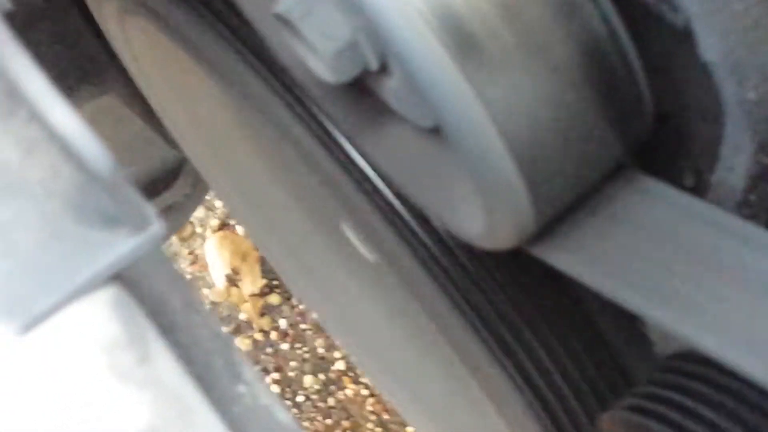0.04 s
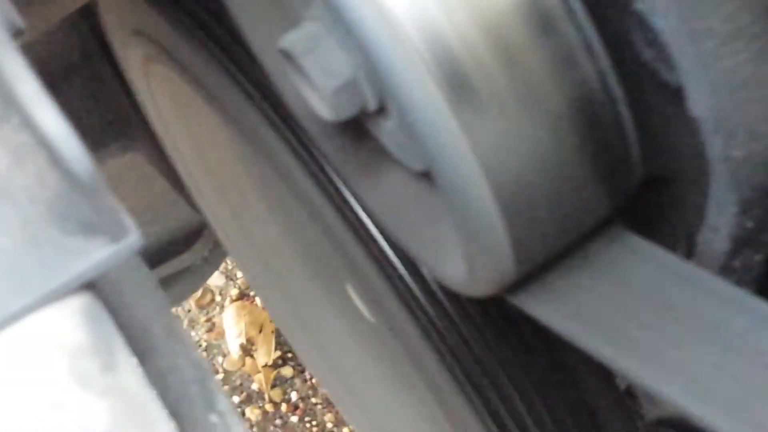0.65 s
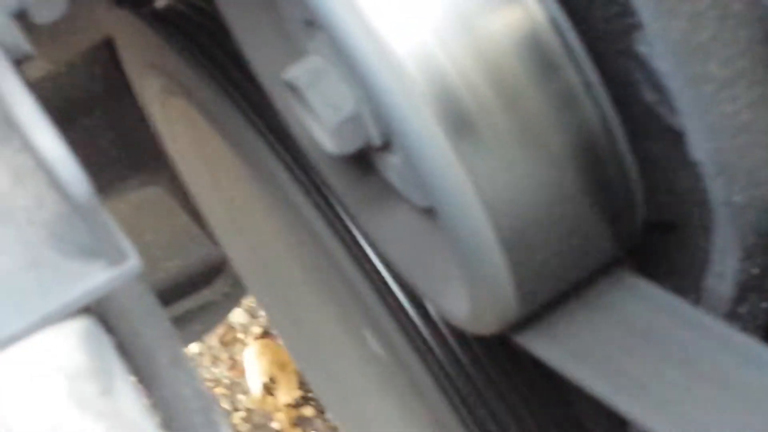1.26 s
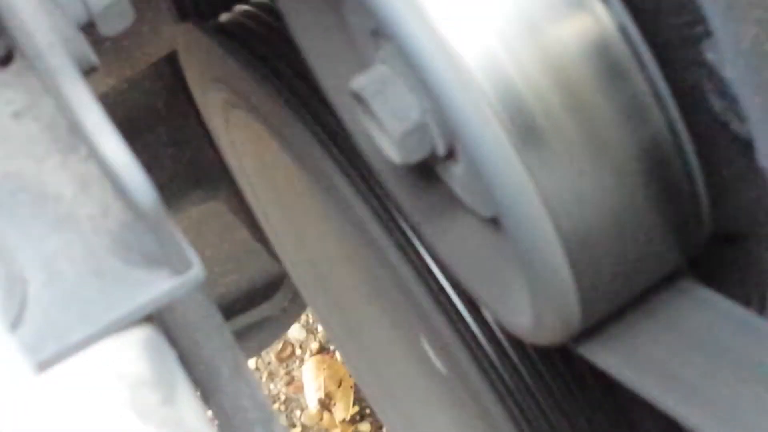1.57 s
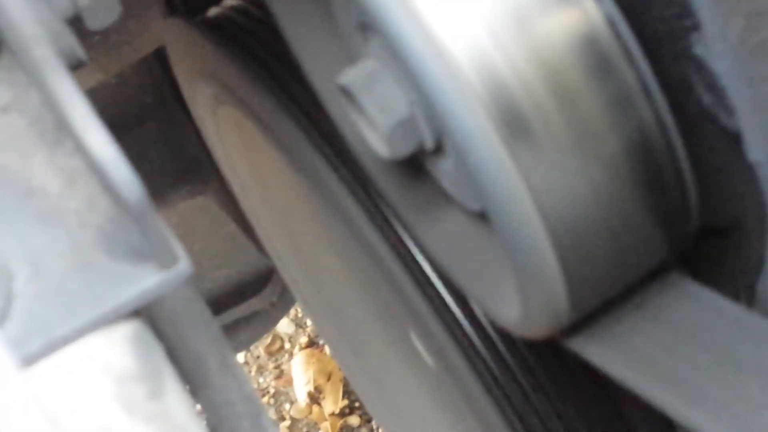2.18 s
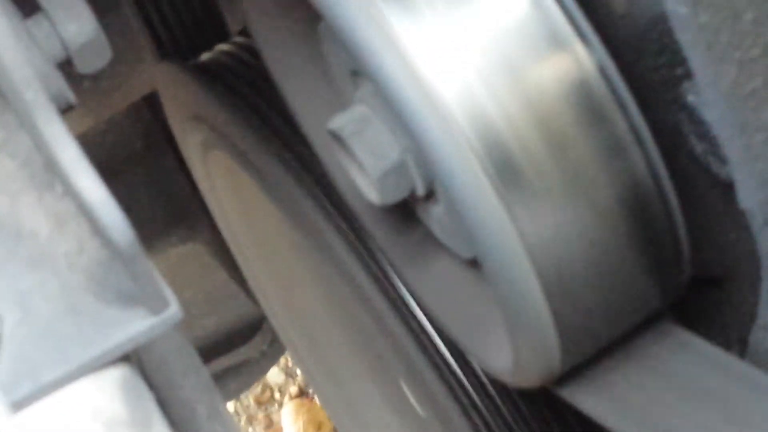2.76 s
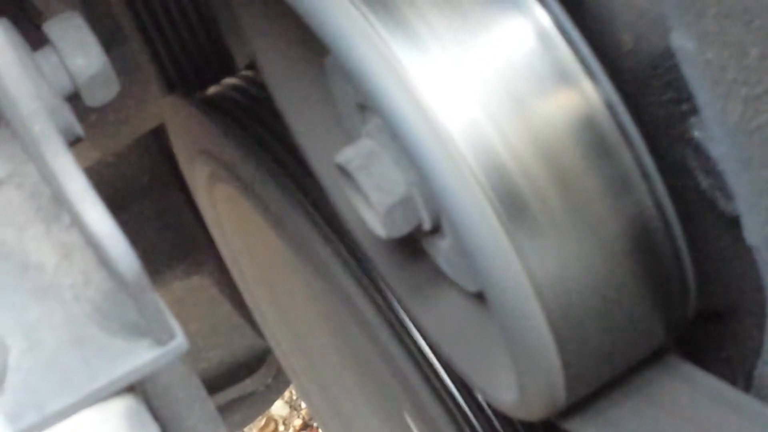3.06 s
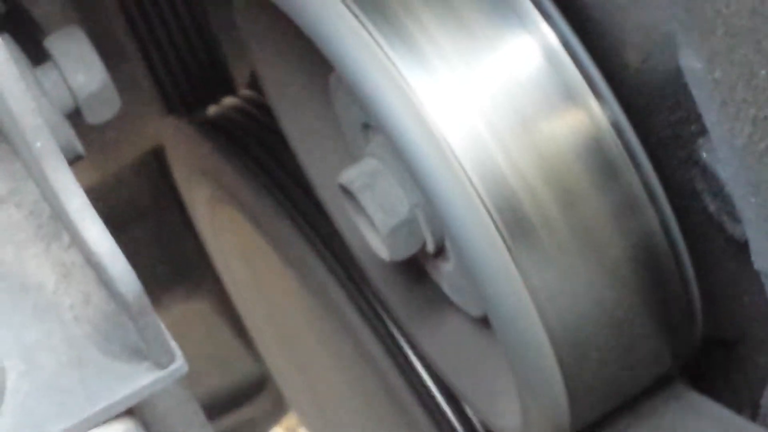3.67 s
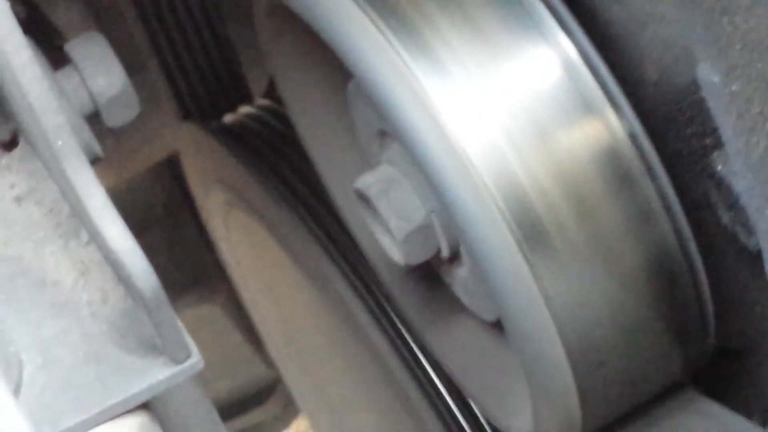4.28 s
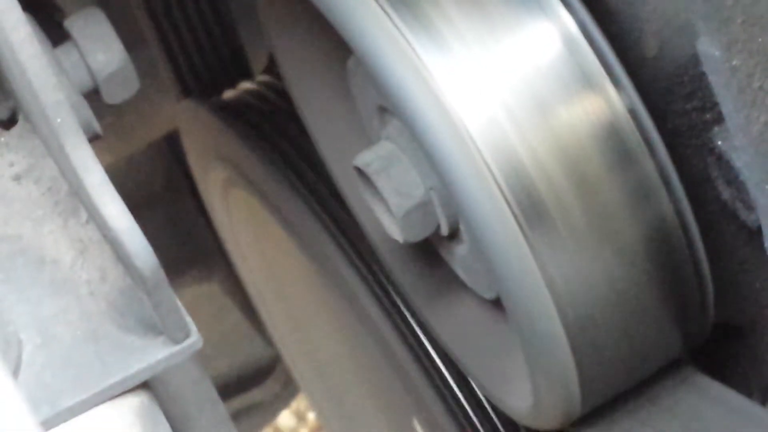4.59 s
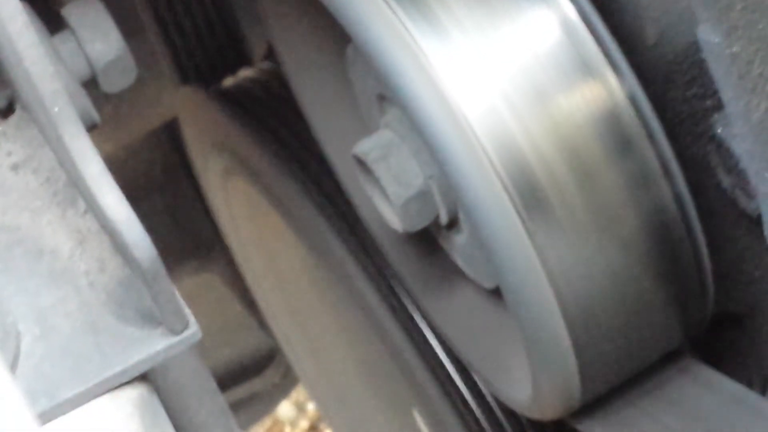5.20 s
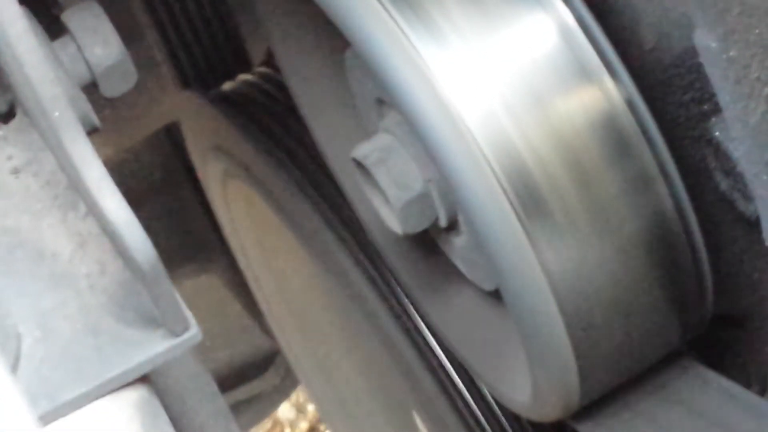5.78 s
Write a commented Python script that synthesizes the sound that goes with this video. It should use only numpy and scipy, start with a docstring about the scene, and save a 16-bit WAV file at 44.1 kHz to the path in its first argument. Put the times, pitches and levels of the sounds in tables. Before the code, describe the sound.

Close up, a slipping drive belt gives a piercing, fluttering squeal and a rhythmic scrape over the low drone of an idling car engine.

```python
"""Engine bay of an idling car, stereo microphone a hand's width from a ribbed belt on a spinning pulley.
The belt sticks and slips, squealing near 4 kHz; once every crank turn it pulls tight, a high chirp dives
and the squeal breaks into a scrape. On the hardest grabs the recorder overloads and crackles. Underneath,
the engine and its fan drone and the accessories whine; the metal all around throws the squeal back."""
import sys
import numpy as np
from scipy import signal
from scipy.fft import rfft, irfft
from scipy.io import wavfile
from scipy.ndimage import uniform_filter1d

SR = 44100
rng = np.random.default_rng(int(sys.argv[2]) if len(sys.argv) > 2 else 0)


def wrap_up_sound(samples):
    """Save the sound to the file named by the first command line argument, as 16-bit audio."""
    columns = np.atleast_2d(samples).T
    # keep every value between -1 and 1, then stretch to whole-number steps
    tamed = np.clip(columns, -1, 1)
    steps = np.round(tamed * 32767).astype(np.int16)
    wavfile.write(sys.argv[1], SR, steps)


N = 266364
TIME, FREQS = np.arange(N) / SR, np.fft.rfftfreq(N, 1 / SR)
FIRINGS, PULLEY_RATIO = 3, 3.888  # cylinder firings and pulley turns per crank turn

# idle speed of the crankshaft: (time [s], speed [turns/s])
IDLE = [(0.0, 13.138), (0.4, 13.292), (1.0, 13.102), (2.0, 13.217), (2.7, 13.135), (3.5, 13.567),
        (4.1, 13.275), (4.7, 12.784), (5.4, 13.333), (6.04, 13.348)]


def belt(turn, swing_db=4.0, flutter_db=3.5, sag_hz=14, tug_hz=20, catch_turns=.062, slack_turns=.065):
    """Drive of scrape and squeal, and their pitch: tension swings once a turn and each firing tugs."""
    # slow changes of tension and tracking: (time [s], scrape drive [dB], squeal drive [dB], pitch [Hz])
    drift = [(0, 1.9, -0.5, 4126), (0.5, 0.03, 0, 4116), (1.4, 0.2, 2, 4103), (2.3, 0.12, 4, 4099),
             (3.0, 0.98, 4.5, 4157), (3.55, -0.5, 5.5, 4157), (4.1, -1.5, -0.5, 4078), (4.65, 0.1, 0, 4094),
             (5.2, -0.57, 0.5, 4132), (6.04, -1, -1.5, 4114)]
    # one lap of the belt, a row per crank turn:
    # (scrape drive when tight [dB], pitch leap when slack [Hz], squeal drive when slack [dB])
    lap = [(3, 80, -1.5), (2, 24.87, -1.5), (1.5, 70, -4), (3.3, 150, -2.5)]
    catch_db, leap_hz, dip_db = np.transpose(lap)
    scrape_db, squeal_db, pitch_hz = curves(drift, TIME)
    tension = np.cos(2 * np.pi * turn)
    tug = np.cos(2 * np.pi * FIRINGS * (turn + .02))
    glaze = np.cos(2 * np.pi * (turn - 1.47) / len(lap))  # one stretch of belt squeals more readily
    dropouts = flutter_db * np.minimum(wander(100), .9)  # the tone falters easily but has an upper limit
    scraping = swing_db * tension + once_a_turn(turn, catch_db, catch_turns) + .97 * wander(12)
    singing = .1 * tension + 1.7 * glaze + once_a_turn(turn - .5, dip_db, slack_turns) + dropouts
    bend = once_a_turn(turn - .5, leap_hz, slack_turns) - sag_hz * tension - tug_hz * tug
    return scrape_db + scraping, squeal_db + singing, pitch_hz + bend


def squeal(turn, squeal_db, pitch_hz, scrape_db, waver_hz=23, wobble_hz=17, depth=0.6):
    """Stick-slip tone: the pitch leaps where the belt runs light, jitters in scrapes, sags in grabs."""
    # fundamental and two overtones: (gain [dB], left over right [dB])
    partials = [(-13.5, 3), (-26.5, -14.5), (-41.5, -9.5)]
    # the mode that radiates the squeal best: (frequency [Hz], width [Hz], boost [dB])
    radiating_mode = [(4130, 35, 2)]
    # the pulley runs slightly out of true: each of its turns gives a spurt of tone with a small glide
    spin = 2 * np.pi * (PULLEY_RATIO * turn + .16 * wander(14.6) - 1 / 4)
    envelope = amp(depth * squeal_db) * (1 + .52 * np.sin(spin))
    leap = 34 * np.maximum(wander(25.4) - scrape_db / 5, 0)
    jitter = 24 * amp(scrape_db) * wander(388) + waver_hz * wander(68.8)
    hz = pitch_hz + leap - leap.mean() + jitter + wobble_hz * np.cos(spin) - 450 * grabs()
    out = np.zeros((2, N))
    for harmonic, (db, side_db) in enumerate(partials, 1):
        # the overtones are steadier in level but sizzle in pitch
        sizzle = (harmonic > 1) * 55 * wander(212.6)
        tone = envelope ** (1 / harmonic) * sine(harmonic * (hz + sizzle))
        rung = shaped(tone, amp(bumps(radiating_mode)))
        heard = bay(rung, t60=.04, wet_db=4) if harmonic > 1 else bay(rung, t60=.06, wet_db=-5)
        out += amp(db) * np.std(tone) * pan(side_db) * heard
    return out


def upper_squeal(pitch_hz, scrape_db, above_hz=360, waver_hz=42, level_db=-27, patchy_db=14):
    """A second mode of the pulley sings in snatches above the first, most when the belt is tight."""
    tone = sine(pitch_hz + above_hz + waver_hz * wander(67.5))
    snatches = amp(.17 * scrape_db + patchy_db * np.minimum(wander(53), 1.2))
    return amp(level_db) * pan(-1) * bay(snatches * tone, t60=.1, wet_db=-12)


def scrape(turn, scrape_db, gain_db=-23, depth=0.88, flicker_db=1.7, grain_db=0.8):
    """Clumps of tiny slips shake the pulley into a rasp and squeaks."""
    # broad colour of the rasp: (frequency [Hz], relative level [dB])
    rasp_colour = [(400, -77), (1800, -26), (2400, -21.5), (2900, -11.5), (3500, -12.5), (4000, 1.5),
                   (4500, -3), (5500, -5), (6700, -10.5), (8300, -9.5), (9400, -19), (10600, -18.5),
                   (11300, -40), (12800, -23), (14400, -49)]
    # ringing of the pulley: (frequency [Hz], width [Hz], boost [dB])
    pulley_modes = [(2760, 13.3, 14.5), (3910, 160, 1.5), (4570, 220, 4.5), (4230, 150, 9),
                    (4900, 90, -2.5), (4910, 70, 1.5), (5228, 100, 5), (6030, 61, 10), (6330, 91, 9),
                    (6884, 144, 8), (7500, 140, 6.5), (8030, 290, 6.5), (9020, 400, 8.5), (12200, 360, -3)]
    # where the rasp sits in the stereo image: (frequency [Hz], left over right [dB])
    rasp_side = [(3000, 0.5), (4100, -0.5), (4500, 0), (4900, -16), (5250, 8), (6200, -6.5), (7600, -2.5),
                 (12500, -14)]
    rubbing = amp(gain_db + depth * scrape_db + flicker_db * wander(71))
    force = np.hypot(rubbing, grabs())
    slips = force * unit(amp(grain_db * wander(990))) * rng.standard_normal((2, N))
    ringing = unit(amp(colour(rasp_colour, pulley_modes)))
    rasp = shaped(slips, ringing * pan(colour(rasp_side)))
    return rasp + squeaks(turn, force)


def squeaks(turn, force, patchy_db=6, waver_hz=50, slide_hz=150):
    """The pulley's modes catch in short squeaks that slide down through each turn of the pulley."""
    # squeaking modes: (frequency [Hz], level [dB])
    modes = [(4490, -25.5), (4770, -33), (4935, -29.5), (5230, -27.5), (7570, -44)]
    out = np.zeros((2, N))
    for hz, db in modes:
        catch = unit(force ** 1.3 * amp(patchy_db * np.minimum(wander(47), 1)))
        pulley_turn = PULLEY_RATIO * turn + wander(10) / 2
        slide = slide_hz * (.5 - pulley_turn % 1)
        tone = catch * sine(hz + slide + waver_hz * wander(93.5))
        out += amp(db) * bay(tone, t60=.056, wet_db=5, count=2)
    return pan(-4) * out


def grabs(width_s=0.011):
    """The belt grabs hard: a short swell of force each time."""
    # hard grabs: (time [s], peak force [dB])
    peaks = [(0.239, -24), (0.91, -24), (1.219, -19), (1.521, -19.5), (1.826, -19.5), (1.973, -23.5),
             (2.124, -21), (2.364, -21), (3.037, -17), (3.632, -22.5), (3.931, -20), (4.61, -23),
             (4.851, -18.5), (5.084, -23.5), (5.154, -20.5)]
    return sum(amp(db) * np.exp(-.5 * ((TIME - s) / width_s) ** 2) for s, db in peaks)


def overload_crackle(gain_db=-31):
    """Thin, bright crackle of the recorder overloading on the hardest grabs, made of noise bursts."""
    # colour of the crackle: (frequency [Hz], relative level [dB])
    crackle_colour = [(800, -65), (5000, 2), (14000, 8)]
    bursts = grabs() * rng.standard_normal((2, N))
    return amp(gain_db) * pan(-7) * shaped(bursts, amp(colour(crackle_colour)))


def dives(turn, level_db=-39, middle_hz=7550, fall_hz_per_turn=4200, lead_turns=0.22, uneven_db=5):
    """As the belt tightens, a high chirp dives, stronger on some turns than on others."""
    heights = amp(uneven_db * np.minimum(rng.standard_normal(round(turn[-1]) + 2), 1))
    ahead = turn + lead_turns
    hz = middle_hz - fall_hz_per_turn * (ahead - np.round(ahead)) + 90 * wander(56)
    chirps = once_a_turn(ahead, heights, width_turns=.05) * sine(hz)
    return amp(level_db) * pan(-6) * bay(chirps, t60=.0072, wet_db=17, count=2)


def crank(first_tight_s=.0075):
    """Turns of the crankshaft so far; the belt is tightest at each whole turn."""
    return np.cumsum(curves(IDLE, TIME)[0]) / SR - IDLE[0][1] * first_tight_s


def engine(turn, level_db=-38, throb=0.037, clatter_share=0.3):
    """Fan noise and a clatter that repeats every six firings; both throb, and boom in the bay's hollows."""
    # drone of engine and fan: (frequency [Hz], relative level [dB])
    drone_colour = [(25, -28), (45, -22), (65, -10), (100, -4), (220, -3.5), (400, -2), (490, -8),
                    (640, -1), (1000, -2.5), (1600, 2.5), (2080, -8.5), (2700, 1.5), (4000, -23),
                    (8000, -2), (14000, -37)]
    # hollows of the engine bay: (frequency [Hz], width [Hz], boost [dB])
    hollows = [(332, 31, 5), (674, 39, 6), (928, 64, 4.5), (1231, 31, 9.5)]
    # likeness of the drone in left and right: (frequency [Hz], correlation [-1 to 1])
    likeness = [(40, 0.47), (130, 0.18), (300, 0.23), (650, 0.61), (900, 0.51), (1300, -0.5), (1800, 0.53),
                (3000, -0.57)]
    firings = FIRINGS * turn
    firing_hz = (firings[-1] - firings[0]) / TIME[-1]
    cycle = rng.standard_normal((2, round(6 * SR / firing_hz)))
    clatter = cycle[:, (firings * SR / firing_hz).astype(int) % cycle.shape[1]]
    fan = rng.standard_normal((2, N))
    noise = np.sqrt(clatter_share) * clatter + np.sqrt(1 - clatter_share) * fan
    left, unrelated = rfft(noise * (1 + throb * np.cos(2 * np.pi * firings)))
    correlation = colour(likeness)
    right = correlation * left + np.sqrt(1 - correlation ** 2) * unrelated
    drone = irfft(np.array([left, right]) * amp(colour(drone_colour, hollows)), N)
    return amp(level_db) * pan(2) * unit(drone)


def accessories(turn, hum_hz=138, sway=0.0023, flutter_db=2.5):
    """Turning parts whine and waver together with the idle speed, over a low hum of steady pitch."""
    # tones of the engine and its accessories: (rate [cycles per crank turn], level [dB])
    whines = [(7.5, -72.5), (9, -65.5), (10.5, -76), (15, -64), (16.5, -66.5), (17.5, -64), (20.83, -62.5),
              (23.83, -60.5), (25, -56), (28.25, -64.5), (52.6, -58), (62.3, -55), (93.6, -60.5)]
    # the hum, swelling near the end: (time [s], level [dB])
    hum_levels = [(0, -64.5), (4.95, -79.5), (5.15, -53), (5.45, -59), (5.7, -51), (6.04, -62)]
    shaft = turn + np.cumsum(IDLE[0][1] * sway * wander(3.87)) / SR
    tones = sum(amp(db + flutter_db * wander(12)) * np.sin(2 * np.pi * ratio * shaft)
                for ratio, db in whines)
    hum = amp(curves(hum_levels, TIME)[0]) * np.sin(2 * np.pi * hum_hz * TIME)
    return np.sqrt(2) * pan(2.1) * (tones + hum)


def bay(x, t60, wet_db, count=4, left_lag_s=.000052):
    """Adds short reflections off the metal, changing as the hand-held microphone drifts; rms 1 a side."""
    t = np.arange(4096) / SR
    tails = rng.standard_normal((count, 2, len(t))) * amp(-60 * t / t60) * (1 - np.exp(-t / .0024))
    left = shaped(x, np.exp(-2j * np.pi * FREQS * left_lag_s))  # direct sound reaches the left port later
    spot = TIME / TIME[-1] * (count - 1)  # the microphone passes `count` spots, each with its own tail
    out = np.zeros((2, N))
    for k, tail in enumerate(tails):
        echoes = signal.oaconvolve(x[None], tail, axes=1)[:, :N]
        heard = [unit(unit(direct) + amp(wet_db) * unit(echo)) for direct, echo in zip((left, x), echoes)]
        out += np.maximum(1 - abs(spot - k), 0) * np.array(heard)
    return np.array([unit(side) for side in out])


def once_a_turn(turn, heights, width_turns):
    """A short swell at each whole turn, taking the given heights in rotation."""
    nearest = np.round(turn)
    height = heights[nearest.astype(int) % len(heights)]
    return height * np.exp(-.5 * ((turn - nearest) / width_turns) ** 2)


def wander(rate_hz):
    """Smooth random motion of rms 1, up to about the given rate."""
    return unit(shaped(rng.standard_normal(N), 1 / (1 + (FREQS / rate_hz) ** 4)))


def sine(hz):
    """A tone that follows a moving pitch."""
    return np.sin(2 * np.pi * np.cumsum(hz) / SR)


def shaped(x, gain):
    """Filters by a gain at each frequency."""
    return irfft(rfft(x) * gain, N)


def colour(points, modes=()):
    """A broad curve on a log-frequency axis, with a bump for each resonance."""
    hz, value = np.transpose(points)
    return np.interp(np.log(FREQS + 1), np.log(hz), value) + bumps(modes)


def bumps(modes):
    """Gain in dB of a few resonances."""
    return sum(db / (1 + (2 * (FREQS - hz) / width) ** 2) for hz, width, db in modes)


def curves(rows, at):
    """Each later column of a table against the first, joined by straight lines."""
    where, *columns = np.transpose(rows)
    return [np.interp(at, where, column) for column in columns]


def pan(db):
    """Gains of the two channels for a left-over-right level, at constant power."""
    pair = amp(np.array([[.5], [-.5]]) * db)
    return pair / np.sqrt(np.mean(pair ** 2, axis=0))


def amp(db):
    """Decibels to gain."""
    return 10 ** (np.asarray(db) / 20)


def unit(x):
    """Scales to rms 1."""
    return x / np.sqrt(np.mean(x ** 2) + 1e-20)


def scene():
    """The belt right at the microphone, the engine underneath; the crankshaft sets their rhythm."""
    turn = crank()
    scrape_db, squeal_db, pitch_hz = belt(turn)
    tones = squeal(turn, squeal_db, pitch_hz, scrape_db) + upper_squeal(pitch_hz, scrape_db) + dives(turn)
    return tones + scrape(turn, scrape_db) + overload_crackle() + engine(turn) + accessories(turn)


def record(dry, aim_db=-8.0, strength=0.35, window_s=0.041, ceiling=.88, edge_hz=14450):
    """The recorder's gain control eases the swells; the highest peaks clip, then the top treble is cut."""
    power_db = 10 * np.log10(uniform_filter1d((dry ** 2).mean(0), round(window_s * SR)) + 1e-12)
    levelled = dry * amp(strength * (aim_db - power_db))
    clipped = np.clip(levelled, -ceiling, ceiling)
    lowpass = signal.firwin(511, edge_hz, window=("kaiser", 9), fs=SR)
    return signal.oaconvolve(clipped, lowpass[None], "same")


dry = scene()
out = record(dry)
wrap_up_sound(out)
```